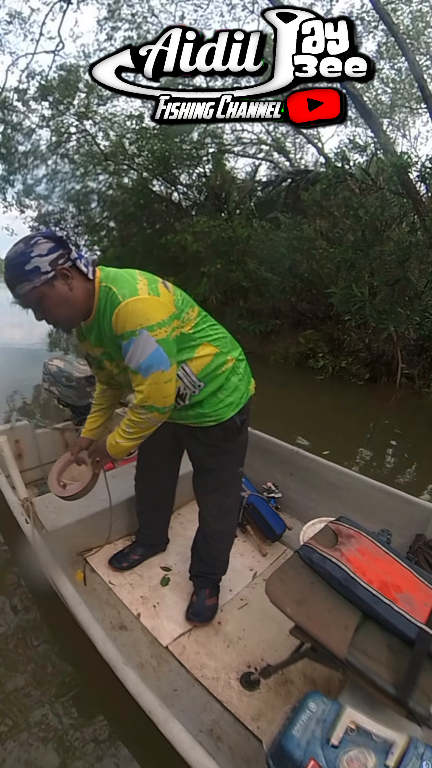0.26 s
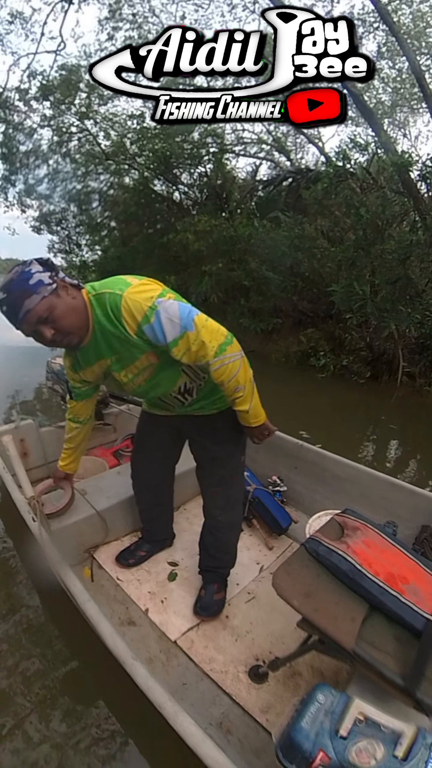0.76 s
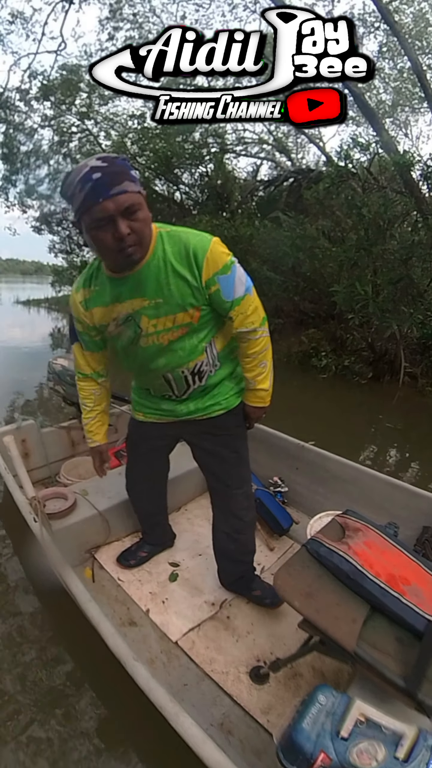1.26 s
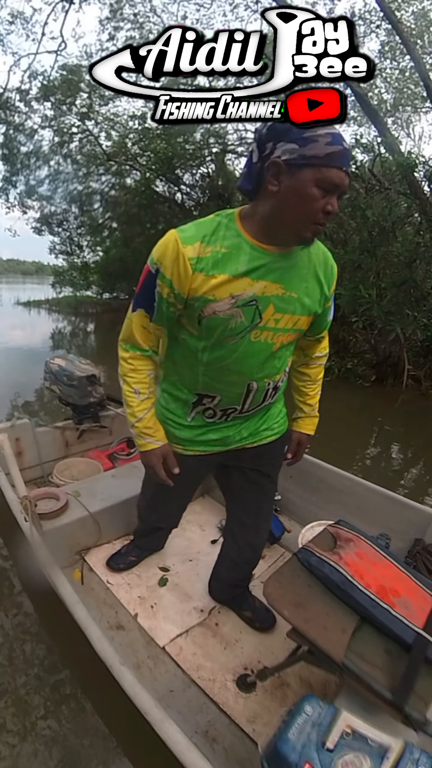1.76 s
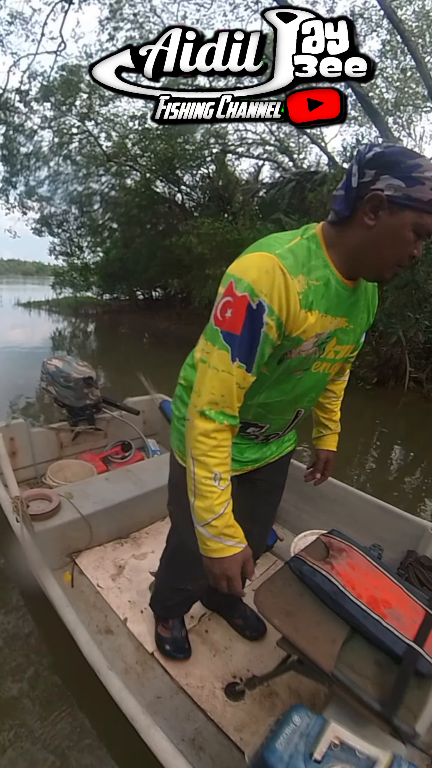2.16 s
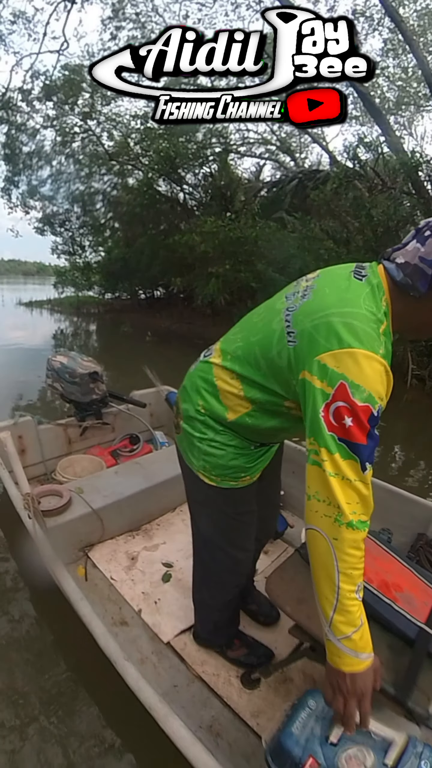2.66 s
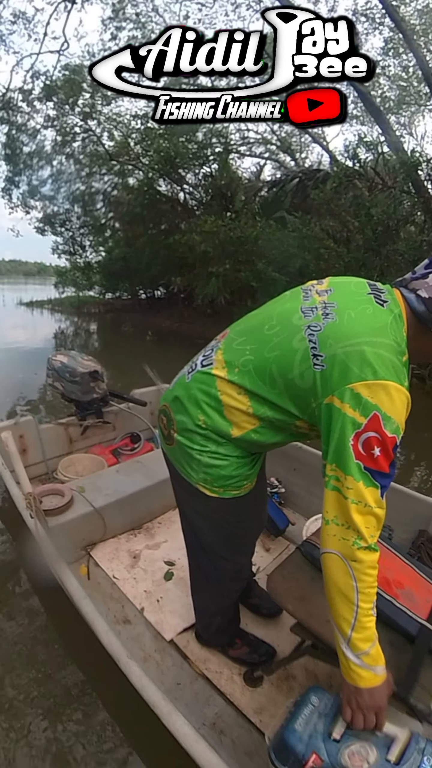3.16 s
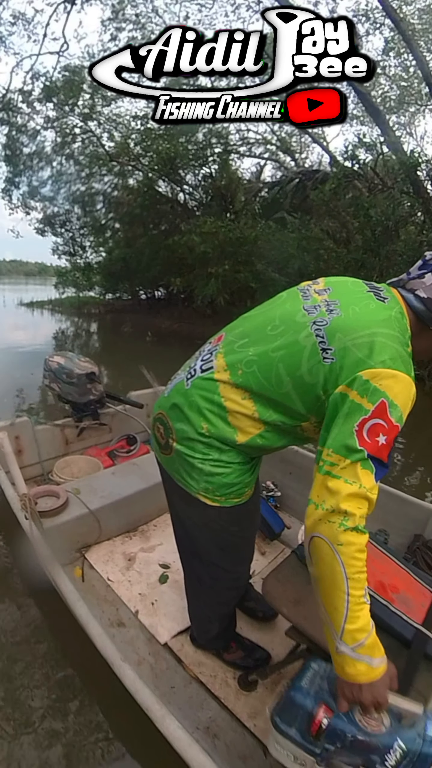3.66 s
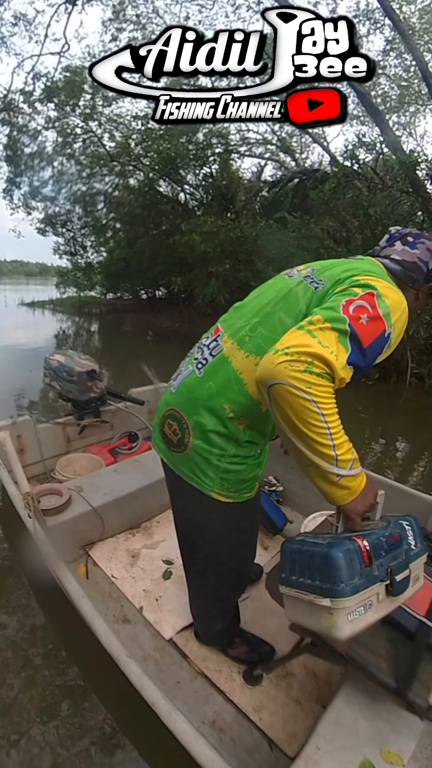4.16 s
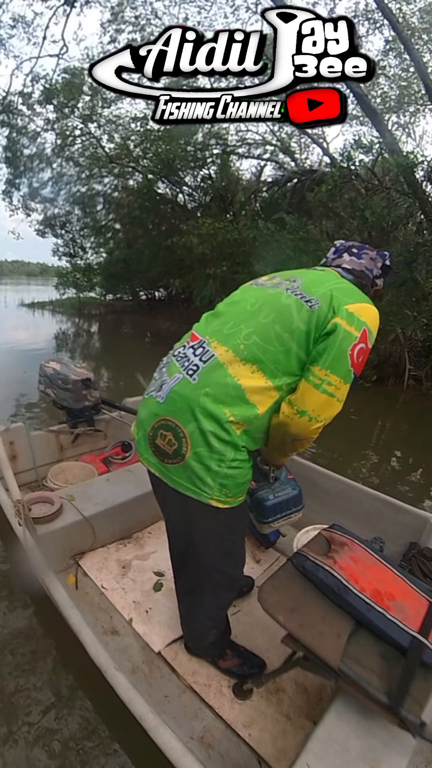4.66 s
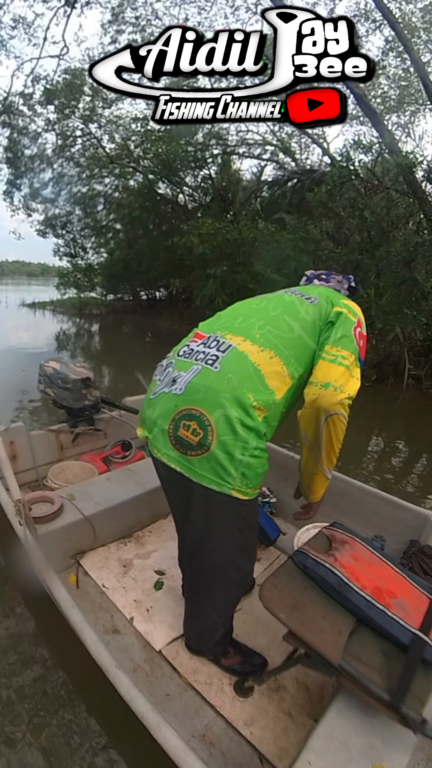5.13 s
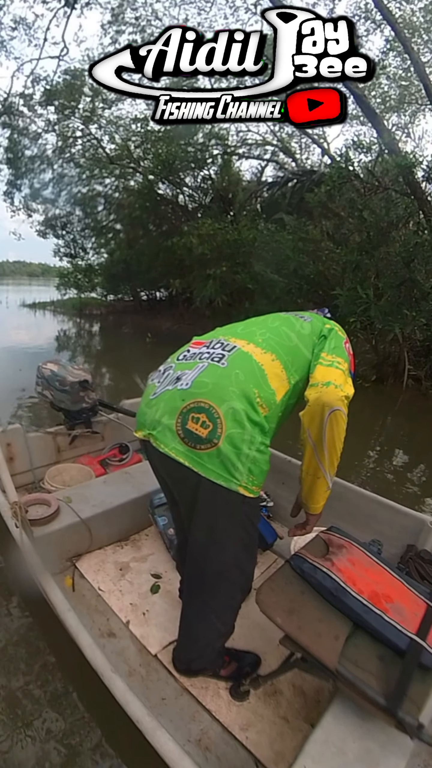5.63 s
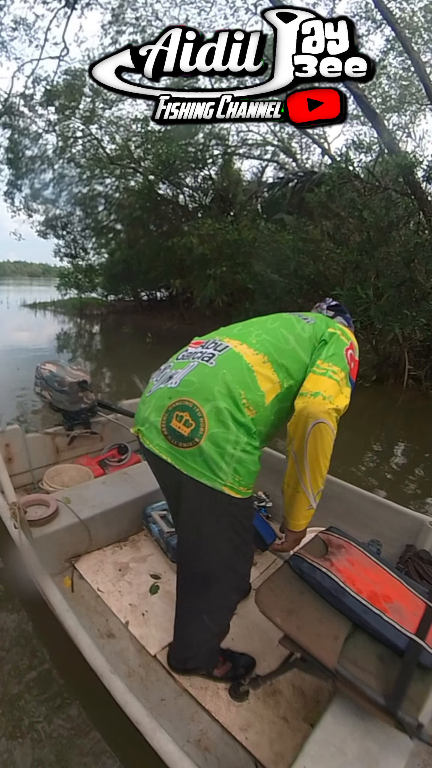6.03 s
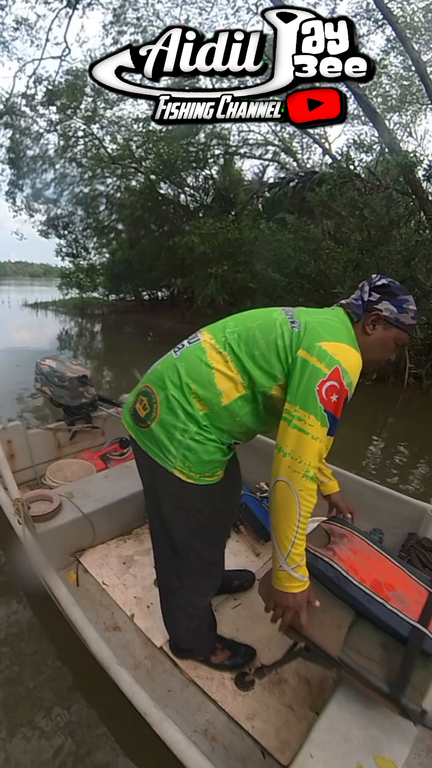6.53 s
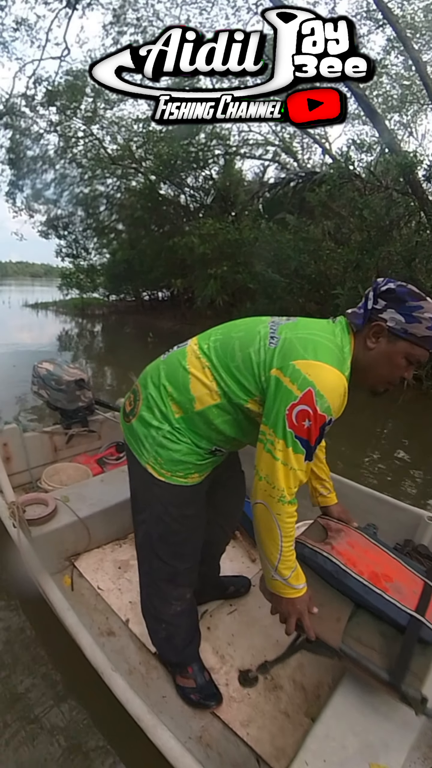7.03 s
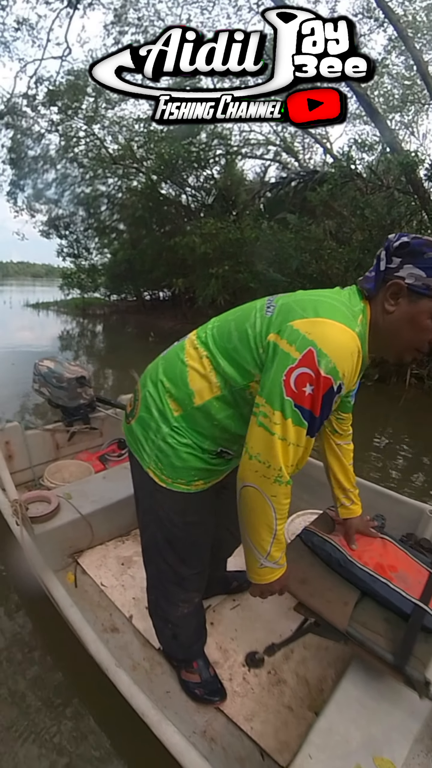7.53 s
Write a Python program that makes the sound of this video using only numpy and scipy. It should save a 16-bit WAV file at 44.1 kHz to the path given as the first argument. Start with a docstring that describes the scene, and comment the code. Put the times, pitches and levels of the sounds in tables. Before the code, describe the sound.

Uneven thuds, clacks and gritty drags ring through a small boat hull on a quiet river, while faint shrill insects flutter from the trees.

```python
"""A small metal boat on a still river: feet, a line spool and a tackle box knock and drag on its floor.
Each knock rings decaying hull modes and adds a noise of contact; drags shake the plates and rasp, scuff and hiss.
The hull booms and drums, louder in the right microphone, which touches it through the mount.
Insects, noise in two high bands that flutters, sing in the trees on the bank over soft river air and hiss."""
import sys
import numpy as np
from scipy import signal
from scipy.fft import rfft, irfft, next_fast_len
from scipy.io import wavfile
from scipy.ndimage import uniform_filter1d, map_coordinates

SR = 44100
rng = np.random.default_rng(int(sys.argv[2]) if len(sys.argv) > 2 else 0)


def wav_out(sig):
    """Save sig, one row per channel (or a flat mono array), as 16-bit PCM at SR to the path in sys.argv[1]."""
    wavfile.write(sys.argv[1], SR, np.round(np.clip(np.atleast_2d(sig).T, -1, 1) * 32767).astype(np.int16))


N = 343539

# Modes of the hull. Each row: pitch in Hz, relative level in dB, base decay by 60 dB in s, base rise in s.
HULL_MODES = [(77.1, -1, 1, 0.02), (93.7, -23.5, 0.95, 0.031), (107.6, 6, 0.13, 0.013),
              (121, -2, 0.23, 0.0034), (148.8, -7.5, 0.4, 0.0013), (164.5, -1, 1, 0.0037),
              (184.26, -15, 0.43, 0.0069), (196, -2.5, .18, 0.0032), (227.9, 4, 0.17, 0.0029),
              (280, 2.5, 0.1, 0.0025), (275.3, -2, 0.14, 0.0015), (331.8, 3.5, 0.16, 0.0057),
              (378.6, 6, 0.11, 0.00066), (415, -14.5, 0.13, 0.00078), (442.5, -3, 0.16, 0.00074),
              (503.8, -4.5, 0.12, 0.00033), (560, -5.5, 0.22, 0.00098), (650, -4, 0.27, 0.0014),
              (706, -12, 0.26, 0.00083), (784, -7, 0.11, 0.0015), (953.2, -27.5, .08, .001),
              (1180, -13.5, .08, .001), (1285.5, -30, .08, .001)]
# Blows on the floor. Each row: start in s, knock level in dB, favoured knock pitch in Hz, clack level in dB,
# crack level in dB, decay of the contact noise by 60 dB in s, drum level in dB, boom level in dB,
# time free in s until a resting weight damps the bottom.
FLOOR_BLOWS = [(0.608, -30.5, 367, -67, -75.0, 0.033, -33, -41, 0.11),
               (0.669, -30.5, 278, -71, -82, 0.029, -51.5, -52, 0.17),
               (0.757, -16.5, 210, -35.5, -51, 0.095, -18, -11.5, 0.12),
               (0.81, -28, 207, -51, -43.5, 0.021, -43, -19, 0.15),
               (1.038, -6.5, 226, -21, -24.5, 0.041, 1, -14, 0.19),
               (1.126, -12, 213, -30.5, -33, 0.051, -8.5, -9, 0.14),
               (1.18, -25, 207, -48.5, -43, 0.04, -11, -30.5, 0.066),
               (1.248, -46, 211, -46, -56, 0.04, -49, -40, 0.21),
               (1.438, -33.5, 207, -81.5, -77, 0.04, -52.5, -24, 0.33),
               (1.58, -16.5, 395, -61, -73, 0.035, -28, -21, 0.089),
               (1.697, -30, 560, -49, -72, 0.049, -36, -41.5, 0.12),
               (2.057, -26.5, 210, -68.5, -64, 0.028, -28, -23.5, 0.059),
               (2.166, -50.5, 277, -76, -79, 0.066, -49, -43, 0.38),
               (2.403, -46, 207, -35.5, -66.5, 0.063, -21.5, -34.5, 0.18),
               (2.427, -22, 217, -29, -51, 0.031, -36.5, -26.5, 0.2),
               (2.576, -17.5, 259, -54, -50, 0.044, -46, -25, 0.041),
               (2.632, -43, 207, -48, -65, 0.094, -43.5, -44, 0.17),
               (2.741, -39, 555, -66.5, -81.5, 0.036, -53, -60, 0.28),
               (2.914, -37.5, 443, -62, -73.5, 0.04, -45.5, -46, 0.17),
               (3.001, -52, 627, -59.5, -58, 0.19, -53, -50.5, 0.12),
               (3.095, -25.5, 207, -62, -78, 0.035, -51.5, -21, 0.063),
               (3.113, -33, 207, -70.5, -75, 0.04, -25.5, -33, 0.1),
               (3.4, -23.5, 516, -48, -67, 0.15, -29.5, -49, 0.14),
               (3.549, -36, 256, -71.5, -70, 0.04, -38, -44, 0.095),
               (3.6, -42.5, 207, -76, -69, 0.043, -29.5, -49, 0.042),
               (3.747, -28.5, 430, -60.5, -75, 0.036, -41, -57, 0.12),
               (3.853, -3.5, 248, -27.5, -34, 0.049, -22.5, -25.5, 0.14),
               (3.871, -30, 207, -28, -46, 0.04, -21, -28, 0.17),
               (3.887, -40, 326, -32, -47.5, 0.052, -37, -21.5, 0.09),
               (4.016, -26, 234, -64, -81, 0.045, -24.5, -22.5, 0.074),
               (4.096, -32, 545, -50, -80.5, 0.082, -49, -44, 0.15),
               (4.188, -30, 226, -43, -73, 0.047, -49, -52.5, 0.25),
               (4.277, -13, 193, -37, -37, 0.073, -21.5, -25.5, 0.098),
               (4.382, -28, 235, -59, -54, 0.043, -29.0, -24.5, 0.19),
               (4.412, -45, 211, -58, -62.5, 0.034, -83, -24, 0.17),
               (4.558, -30, 366, -55, -75, 0.037, -36.5, -37, 0.079),
               (4.622, -32, 250, -57, -66, 0.04, -34.5, -53, 0.14),
               (5.127, -39, 385, -67, -80.5, 0.036, -37.5, -42.5, 0.41),
               (5.703, -39, 655, -70, -86, 0.036, -35, -41, 0.227),
               (5.868, -2, 275, -37, -52.5, 0.15, -9.5, -8, 0.12),
               (5.931, -13, 228, -66, -71, 0.04, -57, -28, 0.14),
               (6.07, -36, 210, -22.5, -30.5, 0.085, -9, -23, 0.069),
               (6.077, 4, 244, -18, -46, 0.02, -21, -1.5, 0.066),
               (6.12, -14.0, 207, -17, -38, 0.011, -25.5, -17, 0.093),
               (6.158, -0.5, 393, -15.5, -19.5, 0.059, -20, -35.5, 0.11),
               (6.3, -3.5, 417, -14.5, -26.5, 0.047, -18, -30, 0.083),
               (6.374, -8.0, 530, -22, -33, 0.048, -59.5, -39.5, 0.11),
               (6.402, -13.5, 368, -39.5, -59, 0.049, -37.5, -30.5, 0.074),
               (7.038, -36, 261, -43, -47.5, 0.071, -12.5, -30.5, 0.029),
               (7.112, -18, 400, -39, -55.0, 0.042, -19.5, -11.5, 0.041),
               (7.167, -13, 415, -36, -46.5, 0.026, -10.5, -16.5, 0.062),
               (7.229, -31, 444, -46, -52, 0.069, -20, -29, 0.1),
               (7.287, -37, 240, -47.0, -45, 0.037, -62, -14, 0.088),
               (7.342, -18.5, 205, -38.5, -56, 0.04, -15, -46, 0.17),
               (7.46, -36.5, 354, -48, -55, 0.049, -37, -22.5, 0.12),
               (7.595, -55, 206, -49.5, -65.5, 0.11, -64, -61, 0.11)]
# The mount carries low modes to the right microphone. Each row: pitch in Hz, left minus right level in dB.
LEFT_LEVEL = [(77, -13), (88, -7), (108, -9), (120, -10), (148, -2), (166, -4), (184, 1), (196, -6),
              (222, -1), (270, .5)]
# Timing between the microphones. Each row: pitch in Hz, phase lead of the left in rad.
LEFT_PHASE = [(88, 2), (108, -.3), (120, .4), (166, .5), (184, -1.8), (196, 1.5), (222, .4), (270, .12),
              (1300, .15)]


def blows():
    """Each blow rings the hull modes at new strengths and adds a short noise of contact."""
    # Scatter of the left phase lead with the place of contact. Each row: pitch in Hz, scatter in rad.
    place_scatter = [(120, 1.2), (200, .8), (270, .25), (500, .1), (1300, .3)]
    # Colour of a blunt edge. Each row: frequency in Hz, relative level in dB.
    clack_colour = [(500, -0.5), (800, 6), (1300, 0.5), (1800, -2.5), (2500, -17), (3200, -16),
                    (5000, -85.5)]
    # Colour of a hard contact. Each row: frequency in Hz, relative level in dB.
    crack_colour = [(1350, -34.5), (2300, -4), (2700, 3), (4830, -7), (6820, -14), (7480, -11.5),
                    (9090, -28), (11800, -60), (20000, -120)]
    least_ring_share, ring_share_per_free_s = 0.15, 1.39  # longer free bounces let the plates ring longer
    hard_touch_s, hard_crack_db = 0.001, -25  # duration scale of a hard blow, at this crack level
    softer_db_per_db = 0.2  # lengthening of the touch for each dB less crack

    hz, mode_db, t60, rise = np.transpose(HULL_MODES)[..., None]
    left_gain, lead = amp(along(LEFT_LEVEL, hz)), along(LEFT_PHASE, hz)
    scatter = along(place_scatter, hz)
    part = part_of_hull(hz)
    length = SR * 2 // 3
    t = np.arange(length) / SR
    ring, contact = np.zeros((2, N + SR)), np.zeros((2, N + SR))
    chance = rng.standard_normal((len(FLOOR_BLOWS), len(HULL_MODES), 1))
    for row, draw in zip(FLOOR_BLOWS, chance):
        s, knock_db, centre_hz, clack_db, crack_db, contact_t60, drum_db, boom_db, free = row
        other_draw = draw[::-1]  # the same chances dealt to other modes
        near_db = -12 * np.log2(hz / centre_hz) ** 2  # a blow favours the plates near its own pitch
        strength_db = np.choose(part, [knock_db + near_db, drum_db, boom_db])

        # the plates ring by their free time; the resting weight damps the drum, and the boom half as much
        ring_share = least_ring_share + ring_share_per_free_s * min(free, 0.25)
        plate_loss_db = 60 * t / (t60 * ring_share)
        damped_db = np.minimum(7 * (t / max(free, 0.02)) ** 3, 24 + 40 * t)
        bottom_loss_db = 60 * t / t60 + damped_db / np.maximum(part, 1)
        loss_db = np.where(part == 0, plate_loss_db, bottom_loss_db)

        touch = hard_touch_s * amp(softer_db_per_db * (hard_crack_db - crack_db))
        swell = (1 - np.exp(-t / (rise + touch))) ** 2
        fade = amp(mode_db + strength_db + 1.8 * draw - loss_db) * swell
        plate_cycles = hz * (1 + 0.05 * other_draw) * t  # the load on the plates shifts each pitch
        bottom_cycles = hz * (t + s)  # bounces fall in step with the swinging bottom
        phase = 2 * np.pi * np.where(part == 0, plate_cycles, bottom_cycles)
        left_phase = phase + lead + scatter * other_draw

        at = round(s * SR)
        ring[0, at:at + length] += np.sum(fade * left_gain * np.sin(left_phase), axis=0)
        ring[1, at:at + length] += np.sum(fade * np.sin(phase), axis=0)
        burst = amp(-60 * t / max(contact_t60, 0.003)) * (1 - np.exp(-t / (0.5 * touch)))
        contact[:, at:at + length] += amp([[clack_db], [crack_db]]) * burst

    clack_gain, crack_gain = contact[:, :N]
    clack = clack_gain * rush(clack_colour, [(1000, 0.91)], pan_db=0.4, patchy_db=3.5)
    crack = crack_gain * rush(crack_colour, [(1000, 0.88)], pan_db=2.5, patchy_db=2.5)
    return ring[:, :N] + clack + crack


def taps():
    """Small hard parts of the gear tap; each tap rings two close modes that roughen its short tone."""
    # Each row: start in s, pitch in Hz about which the two modes scatter, level of each mode before its
    # rise and decay in dB, decay by 60 dB in s.
    gear_taps = [(.139, 700, -74, 0.023), (1.04, 1890, -29.5, .04), (1.185, 1300, -46, .05),
                 (1.25, 1190, -49, .05), (1.45, 960, -56, 0.059), (1.46, 1650, -61, .05),
                 (2.405, 1044, -36.5, 0.094), (2.442, 2750, -35, .05), (2.577, 890, -42, 0.043),
                 (2.635, 2020, -57, 0.069), (3.002, 810, -60, .03), (3.394, 820, -35.5, 0.044),
                 (3.89, 2350, -27.5, .04), (4.017, 685, -44.5, 0.052), (4.102, 1750, -53.5, 0.12),
                 (4.54, 2490, -59, .08), (4.63, 2480, -65, 0.1), (4.195, 1280, -48, 0.045),
                 (5.703, 764, -54, 0.064), (6.078, 830, -16.5, 0.053), (6.12, 880, -30, 0.027),
                 (6.406, 650, -29, 0.04), (6.406, 2370, -40, 0.029), (7.135, 1800, -44, .04)]
    split = 0.05  # scatter of each mode, as a share of the pitch
    out, t = np.zeros(N + SR), np.arange(SR // 5) / SR
    chance = rng.standard_normal((len(gear_taps), 2, 1))
    for (s, hz, db, t60), draw in zip(gear_taps, chance):
        pair = np.sin(2 * np.pi * hz * (1 + split * draw) * t).sum(axis=0)
        fade = amp(db - 60 * t / t60) * (1 - np.exp(-t / 0.0015))
        at = round(s * SR)
        out[at:at + len(t)] += fade * pair
    return out[:N]


def drag():
    """Soles and gear slide in small slips that shake the plates, rasp, scuff and hiss."""
    # Colour of coarse contact. Each row: frequency in Hz, relative level in dB.
    rasp_colour = [(500, -42), (750, -6.5), (950, 2.5), (1300, 5), (1600, -3), (2200, -30.5), (4000, -85)]
    # Colour of lighter contact. Each row: frequency in Hz, relative level in dB.
    scuff_colour = [(900, -55), (1400, 0.5), (1800, 7.5), (2400, 1.5), (2900, -5.5), (4000, -42.5)]
    # Colour of fine contact. Each row: frequency in Hz, relative level in dB.
    hiss_colour = [(1800, -52.5), (2600, 4.5), (3000, 7), (3700, 4.5), (5000, -1), (6500, -2),
                   (9000, -43.5)]
    shake_gain, rasp_gain, scuff_gain, hiss_gain = slides()
    knock_db = np.transpose(FLOOR_BLOWS)[1]
    rattle_gain = after_blows(knock_db - 17.5, t60=0.14)  # loose gear shakes the plates after a knock

    slips = wobble(60)
    force = amp(3 * slips) * rng.standard_normal(N)
    pressed_plates = hull_part(0, damping=1.8, top_hz=838)  # the sliding weight widens the plate modes
    shake = (shake_gain + rattle_gain) * unit(filtered(force, pressed_plates))

    grit = amp(0.6 * slips + 0.47 * wobble(340))
    rasp = rasp_gain * rush(rasp_colour, [(1000, 0.82)], pan_db=-0.5, patchy_db=3, shape=grit)
    scuff = scuff_gain * rush(scuff_colour, [(1000, 0.88)], pan_db=0.5, patchy_db=2.6, shape=grit)
    hiss = hiss_gain * rush(hiss_colour, [(1000, 0.85)], pan_db=1.5, patchy_db=2.6, shape=grit)
    return shake + rasp + scuff + hiss


def slides():
    """Gains of the four layers of friction: every slide rises, holds and falls."""
    # Slides of soles and gear. Each row: full at s, rise in s, hold in s, fall in s,
    # then the levels in dB of shake, rasp, scuff and hiss.
    floor_slides = [(.66, 0.13, 0, 0.039, -46.5, -62.5, -93, -88),
                    (0.798, 0.037, 0.049, 0.043, -46, -60, -66, -63.5),
                    (1.03, .02, 0.22, .09, -44.5, -54.5, -62, -61.5),
                    (1.45, 0.041, 0.0096, 0.11, -60, -63.5, -75, -74),
                    (1.599, 0.09, 0.0079, 0.16, -36, -56, -68, -82),
                    (1.72, 0.072, 0.11, 0.054, -51.5, -67.5, -76, -84),
                    (1.805, 0.014, 0, 0.028, -59, -59, -71, -83),
                    (2.019, 0.04, 0.012, 0.045, -44, -71, -82, -88),
                    (2.069, 0.044, 0.01, 0.03, -52, -53.5, -72, -70),
                    (2.25, .1, 0.053, 0.046, -54.5, -78, -83, -91),
                    (2.424, 0.029, 0.048, 0.12, -34, -36.5, -46, -49.5),
                    (2.508, .04, .04, 0.024, -34, -61, -64, -58),
                    (2.588, 0.011, 0.0098, 0.031, -30, -67, -64, -60),
                    (2.715, 0.11, 0.055, .06, -56.5, -67.5, -86, -86),
                    (3.046, 0.03, 0.035, .04, -49, -61.5, -78, -80.5),
                    (3.351, 0.036, 0.032, 0.036, -56, -75, -91, -88),
                    (3.566, 0.018, 0.0034, 0.08, -44, -67, -69, -64.5),
                    (3.757, 0.023, 0.0077, 0.076, -45, -53.5, -73, -82),
                    (3.873, 0.016, 0.022, 0.085, -23.5, -38.5, -45.5, -48),
                    (4.13, 0.034, 0.047, 0.055, -44, -59.5, -63, -72),
                    (4.198, 0.021, 0.043, .04, -48, -58, -61, -62),
                    (4.288, 0.021, 0, 0.08, -37, -40, -43.5, -42.5),
                    (4.41, 0.12, 0.016, 0.033, -37, -55.5, -64, -70),
                    (4.559, 0.033, 0.013, 0.029, -39, -56.5, -65, -82),
                    (4.64, 0.12, 0.041, 0.023, -49, -66, -75, -76),
                    (4.865, 0.14, 0.008, .04, -53, -62, -77, -72),
                    (5.14, 0.06, 0.014, .08, -67, -59.5, -70, -91),
                    (5.369, 0.094, 0.16, 0.13, -37.5, -44.5, -50.5, -61),
                    (6.007, 0.062, 0.035, 0.025, -38.5, -55.5, -59, -60),
                    (6.098, 0.06, 0.018, 0.12, -27, -40.5, -42.5, -46.5),
                    (6.195, 0.037, 0.034, 0.085, -31.5, -40.5, -41.5, -44),
                    (6.284, 0.033, 0.016, 0.018, -44, -57, -51.5, -51),
                    (6.344, 0.088, 0.018, 0.019, -46, -54, -57, -55),
                    (6.394, 0.017, 0.014, 0.083, -55, -52, -53.5, -54.5),
                    (6.787, 0.0305, 0.3, 0.15, -79, -66.5, -80, -91),
                    (7.133, 0.3, 0.11, 0.21, -27.5, -47.5, -49, -50.5),
                    (7.364, 0.044, .07, 0.063, -54, -68, -74.5, -77),
                    (7.47, .03, 0.024, 0.043, -37.5, -58, -71, -65),
                    (7.522, 0.051, 0.005, 0.069, -52, -73, -77, -73.5),
                    (7.595, 0.037, 0.0072, 0.12, -54.5, -60, -67, -76)]
    range_db = 30  # what a rise or fall spans
    roundness = 0.93  # over 1 rounds the top of a swell
    t, gains = np.arange(N) / SR, 0
    for s, rise, hold, fall, *levels_db in floor_slides:
        before = np.maximum((s - t) / max(rise, 0.005), 0)
        after = np.maximum((t - s - hold) / max(fall, 0.005), 0)
        swell = amp(-range_db * (before + after) ** roundness)
        gains = gains + amp(levels_db)[:, None] * swell
    return uniform_filter1d(gains, size=330, axis=1)


def murmur():
    """Shifting weight and lapping water keep all three parts of the hull faintly sounding."""
    # Each row: time in s, mean levels in dB of knock, drum and boom, about which each wavers.
    hull_murmur = [(0.0, -61.5, -65.5, -72.5), (0.56, -65, -67, -66), (1.0, -53, -36, -46.5),
                   (1.23, -59, -30.5, -56.5), (1.8, -53.5, -57.5, -50), (3.38, -61.5, -60.5, -46.5),
                   (3.75, -45, -67.5, -45), (4.4, -53, -30.5, -41), (4.86, -48, -64.5, -46.5),
                   (5.29, -44, -33.5, -46), (5.88, -55, -51, -53), (6.05, -42.5, -30.5, -24.5),
                   (6.25, -42, -24, -49), (6.44, -45, -78, -67), (6.75, -46, -68, -48),
                   (7.03, -78, -36, -42), (7.22, -42, -26.5, -33), (7.35, -49, -24, -35),
                   (7.55, -59.5, -60, -56.5), (7.79, -65.5, -58, -68)]
    plates_gain, drum_gain, boom_gain = amp(curves(hull_murmur) + 2.2 * wobble(7))
    # the bottom keeps stirring after a blow
    drum_db, boom_db = np.transpose(FLOOR_BLOWS)[6:8] - 23
    drum_gain = drum_gain + after_blows(drum_db, t60=0.73)
    boom_gain = boom_gain + after_blows(boom_db, t60=0.73)

    force, nearby = rng.standard_normal((3, N)), rng.standard_normal((2, 2, N))
    drum_force, boom_force = force[1:, None] + 1.2 * nearby  # each microphone also feels forces of its own
    loaded = 2.2  # feet and gear widen the modes
    plate_modes = hull_part(0, loaded, top_hz=644, centre_hz=366, narrow_db=32.5)
    plates = plates_gain * unit(filtered(force[0], plate_modes))
    drum = drum_gain * unit(filtered(drum_force, hull_part(1, loaded, top_hz=230)))
    boom = boom_gain * unit(filtered(boom_force, hull_part(2, damping=0.73, top_hz=149)))
    return plates + drum + boom


def part_of_hull(hz):
    """0 for the knock of the floor plates, 1 for the drum of the bottom, 2 for the boom of the whole shell."""
    boom_top_hz, drum_top_hz = 135, 205
    return (hz < drum_top_hz) * 1 + (hz < boom_top_hz)


def hull_part(part, damping, top_hz, centre_hz=380, narrow_db=0):
    """Stereo response of one part of the hull to a soft random force that favours modes near a centre."""
    def response(f):
        out = 0
        for hz, db, t60, _ in HULL_MODES:
            if part_of_hull(hz) == part:
                width = np.log(1000) / np.pi / t60 * damping  # in Hz: faster decay, broader resonance
                near_db = -narrow_db * np.log2(hz / centre_hz) ** 2
                resonance = 1j * f * np.sqrt(width) / (hz * hz - f * f + 1j * f * width)
                left = amp(along(LEFT_LEVEL, hz)) * np.exp(1j * along(LEFT_PHASE, hz))
                out = out + amp(db + near_db) * resonance * np.array([[left], [1]])
        return out / (1 + (f / top_hz) ** 4)  # a soft contact loses force above top_hz
    return response


def after_blows(levels_db, t60, build_s=0.0048):
    """A gain that builds up at each blow and dies away."""
    kicks = np.zeros(N)
    starts = np.round(np.transpose(FLOOR_BLOWS)[0] * SR).astype(int)
    kicks[starts] = amp(levels_db)
    build = np.exp(-1 / (build_s * SR))
    decay = amp(-60 / (t60 * SR))
    return signal.lfilter([1 - build], np.convolve([1, -build], [1, -decay]), kicks)


def insects():
    """Many callers share each band; their pulses overlap into a fast uneven flutter."""
    # Level of the singing. Each row: time in s, low band level in dB.
    chorus_level = [(0.0, -52), (0.87, -50.5), (1.54, -54), (2.1, -50), (2.84, -54), (3.32, -49),
                    (4.06, -53.5), (4.4, -50.5), (6.18, -52.5), (6.59, -55), (7.35, -51), (7.79, -53)]
    # Colour of the low band. Each row: frequency in Hz, relative level in dB.
    low_song = [(3820, -58.5), (6500, -69.5), (6740, -3), (7180, 14), (7590, 12.5), (7870, -8),
                (8050, -11.5), (10500, -49), (17700, -120)]
    # Colour of the high band. Each row: frequency in Hz, relative level in dB.
    high_song = [(4740, -34), (8050, -14.5), (8190, 22.5), (8440, 27), (8790, 22), (9010, 4.5), (9090, -24),
                 (11800, -45.5), (20000, -120)]
    level, = amp(curves(chorus_level))
    flutter = amp(1.3 * wobble(160) + 0.27 * wobble(25))
    alike = [(7000, 0.86), (8600, 0.8)]  # Hz, likeness of the two microphones
    low = rush(low_song, alike, pan_db=1.5, patchy_db=1.0, shape=flutter)
    high = rush(high_song, alike, pan_db=1.0, patchy_db=-1.0, shape=flutter)
    high_under_db = 12.5  # the high band under the low one
    return level * (low + amp(-high_under_db) * high)


def river_air():
    """River air and microphone hiss: steady coloured noise, most alike at the two ports in the low mids."""
    # Colour of the air and hiss. Each row: frequency in Hz, relative level in dB.
    air_colour = [(20, -23.5), (90, 7), (300, -11.5), (570, -7), (750, -18.5), (1000, -20.5), (1400, -26.5),
                  (2000, -26.5), (2400, -27), (3200, -28.5), (4500, -28.5), (5800, -28.5), (6400, -37.5),
                  (9000, -54)]
    # Air at the two ports. Each row: frequency in Hz, likeness from 0 to 1.
    port_likeness = [(60, .2), (150, .6), (300, .97), (700, .97), (1500, .8), (5000, .6)]
    return amp(-58) * rush(air_colour, port_likeness, pan_db=3.5, patchy_db=3.0)


def rush(spectrum, alike, pan_db, patchy_db, shape=1):
    """Stereo noise of rms 1 before panning, with patches of random gain, pulsed by shape before it is coloured."""
    z = signal.stft(shape * rng.standard_normal((2, N)), nperseg=512)[2]
    field = uniform_filter1d(rng.standard_normal(z.shape[1:]), size=3, axis=0)
    field = uniform_filter1d(field, size=15, axis=1)
    both = signal.istft(z * amp(patchy_db * unit(field)), nperseg=512)[1][:, :N]

    def mid_side(hz):
        turn = np.arccos(np.clip(along(alike, hz), -1, 1)) / 2  # more side makes the channels less alike
        return amp(along(spectrum, hz)) * np.array([np.cos(turn), np.sin(turn)])

    mid, side = filtered(both, mid_side)
    return unit(np.array([mid + side, mid - side])) * amp([[pan_db / 2], [-pan_db / 2]])


def amp(db):
    """dB to gain."""
    return 10 ** (np.asarray(db) / 20)


def unit(x):
    """x at rms 1."""
    return x / np.sqrt(np.mean(x ** 2) + 1e-20)


def along(points, hz):
    """Value at hz between (Hz, value) points on a log axis."""
    f, v = np.transpose(points)
    return np.interp(np.log(hz + 1), np.log(f + 1), v)


def curves(rows):
    """One level in dB per sample for each column after the time; -150 dB outside the rows."""
    s, *cols = np.transpose(rows)
    t = np.arange(N) / SR
    return np.array([np.interp(t, s, c, left=-150, right=-150) for c in cols])


def wobble(rate):
    """A smooth random curve, rate knots a second."""
    knots = rng.standard_normal(int(N * rate / SR) + 4)
    return map_coordinates(knots, [np.arange(N) * rate / SR])


def filtered(x, response):
    """x filtered by a complex response of frequency."""
    m = next_fast_len(N + SR)
    return irfft(rfft(x, m) * response(np.fft.rfftfreq(m, 1 / SR)), m)[..., :N]


def scene():
    """Everything that reaches the two microphones."""
    return blows() + taps() + drag() + murmur() + insects() + river_air()


def record(dry):
    """The microphones lose the deepest bass, the loudest peaks round off, nothing passes above the band limit."""
    bass_hz, ceiling, top_hz = 36, 0.97, 9100
    thin = filtered(dry, lambda hz: (1j * hz / (1j * hz + bass_hz)) ** 3)
    soft = thin / (1 + np.abs(thin / ceiling) ** 6) ** (1 / 6)
    return filtered(soft, lambda hz: hz < top_hz)


dry = scene()
out = record(dry)
wav_out(out)
```